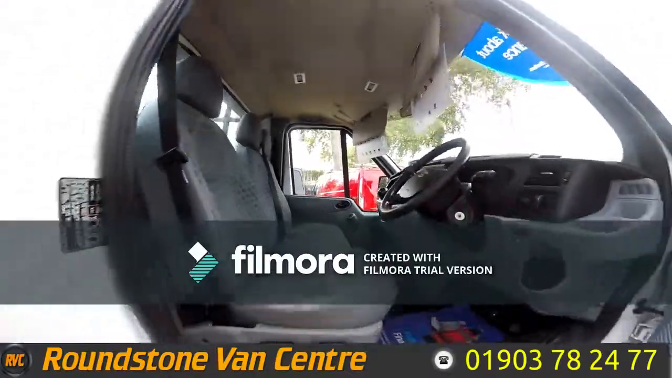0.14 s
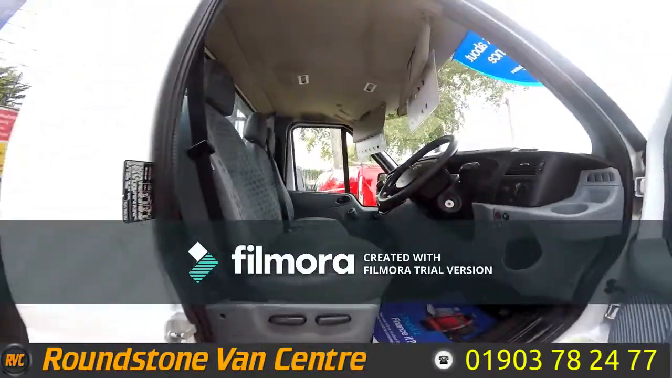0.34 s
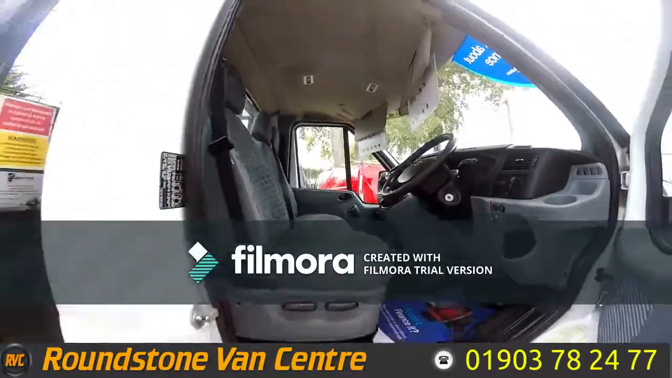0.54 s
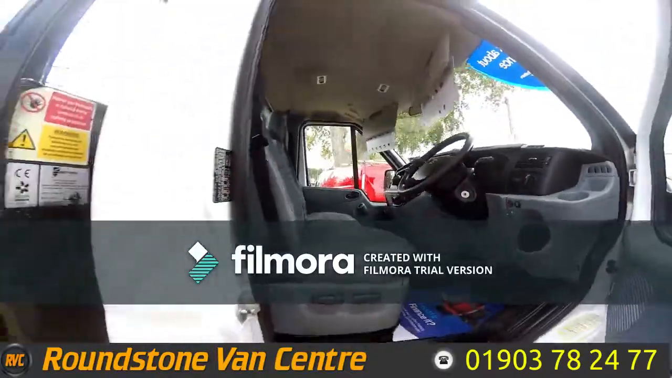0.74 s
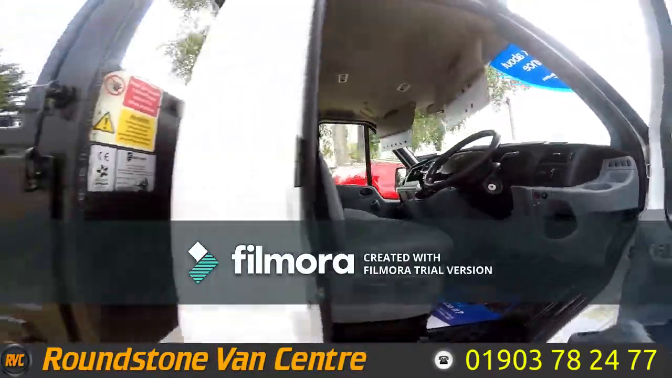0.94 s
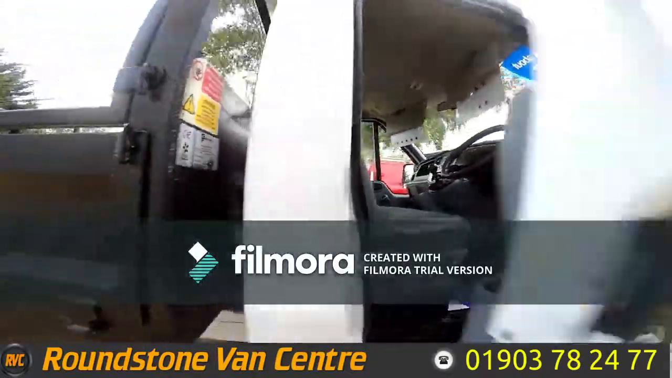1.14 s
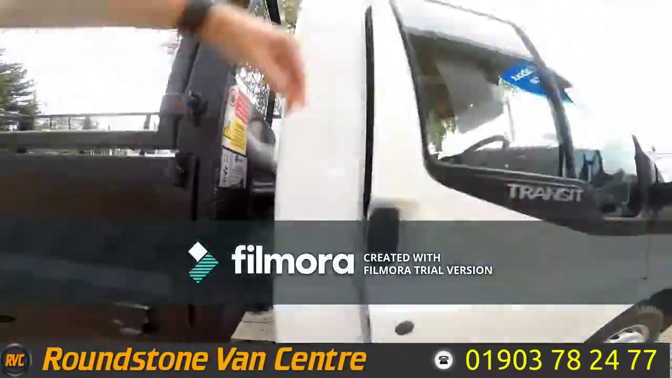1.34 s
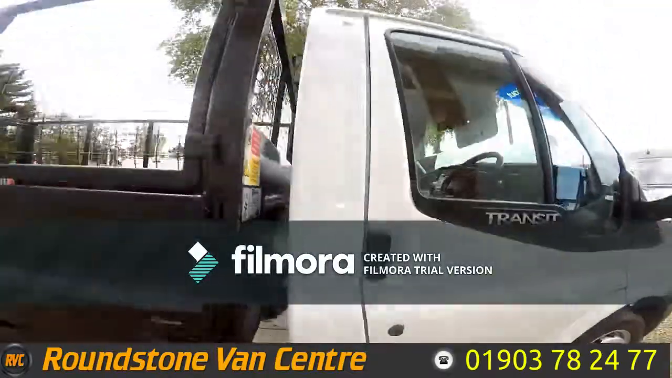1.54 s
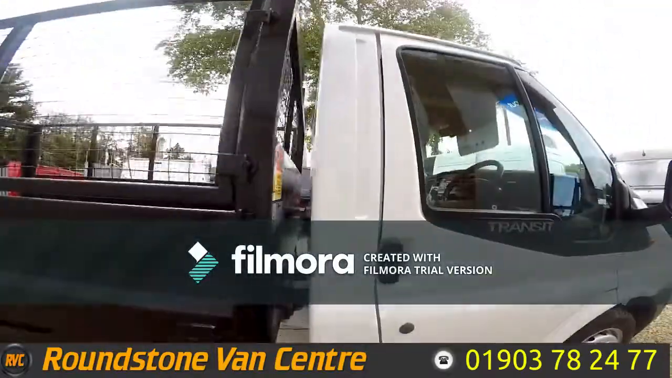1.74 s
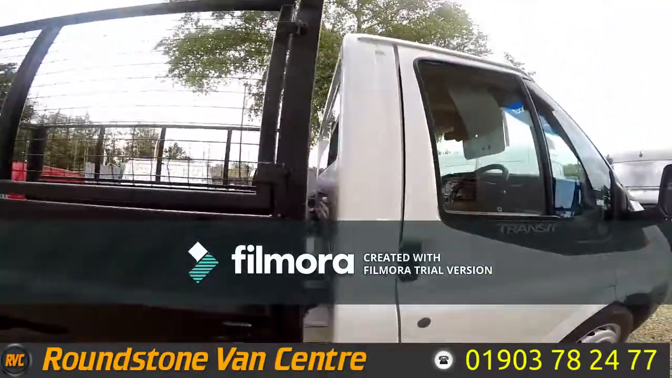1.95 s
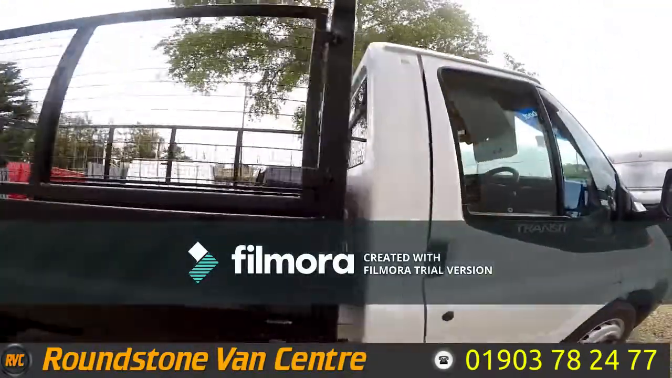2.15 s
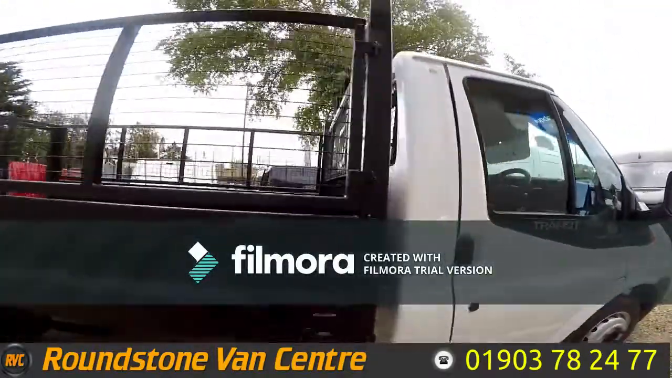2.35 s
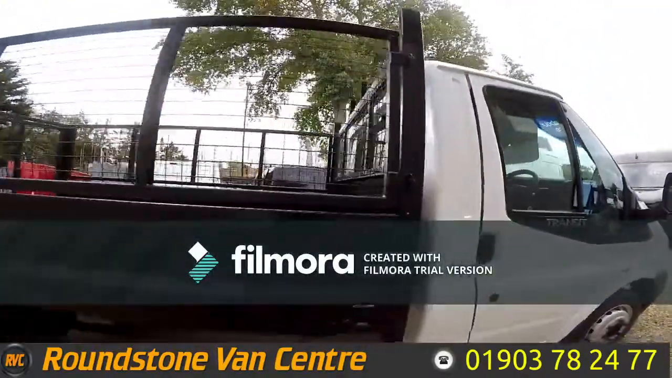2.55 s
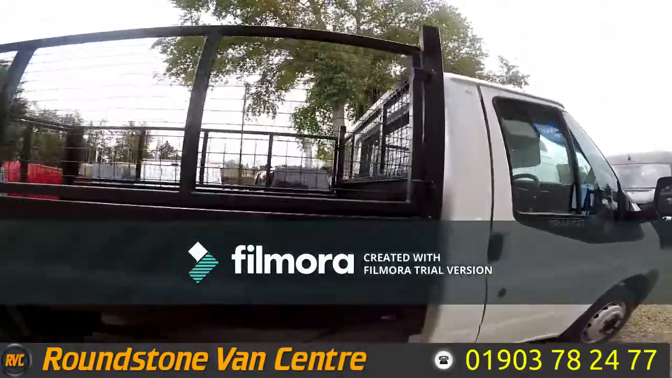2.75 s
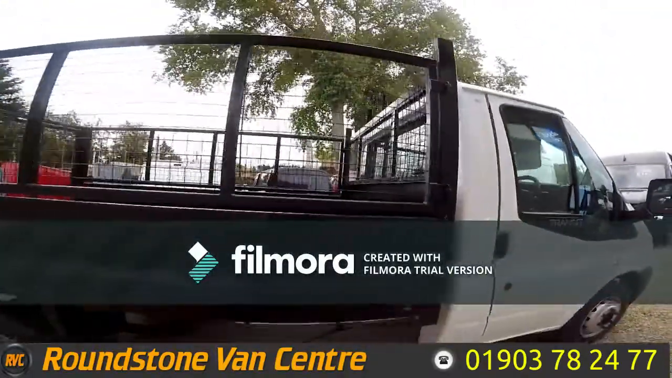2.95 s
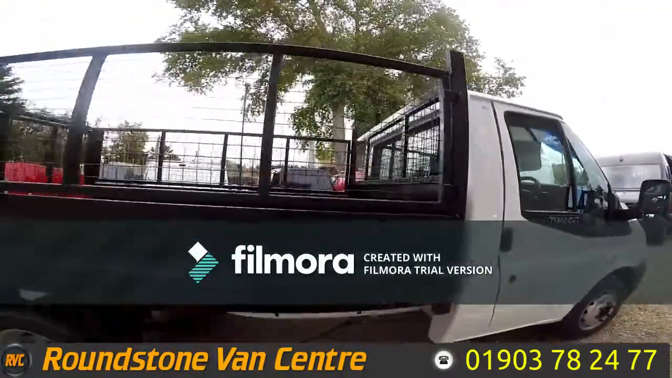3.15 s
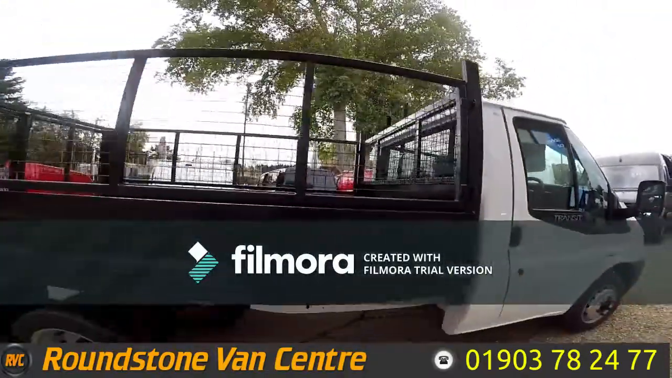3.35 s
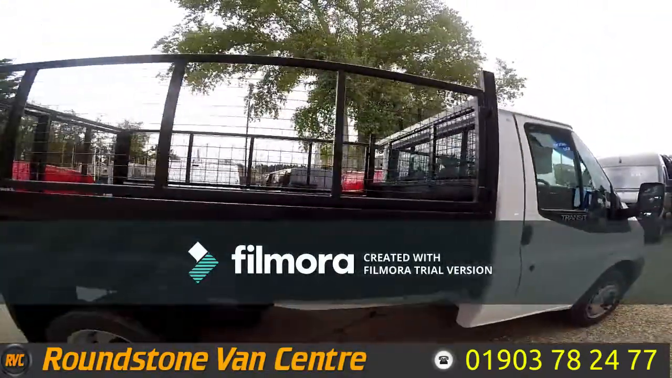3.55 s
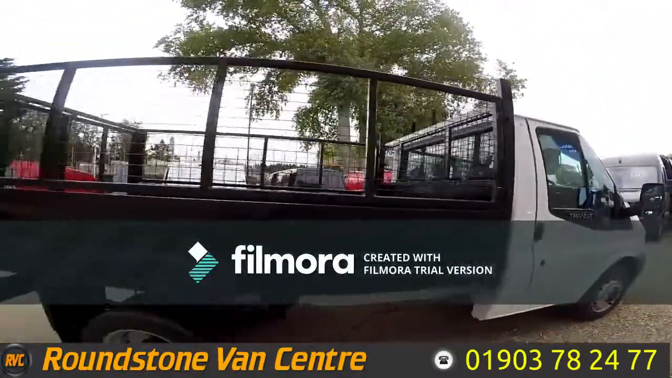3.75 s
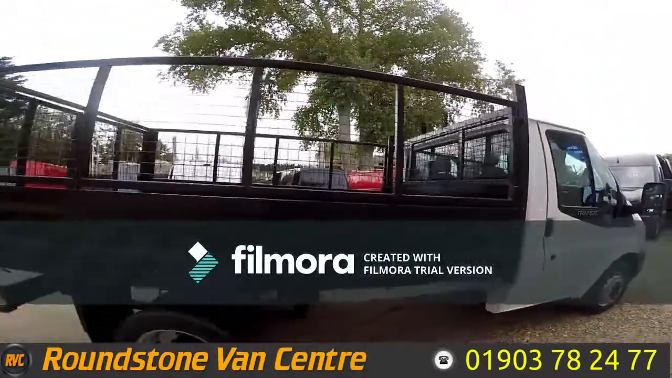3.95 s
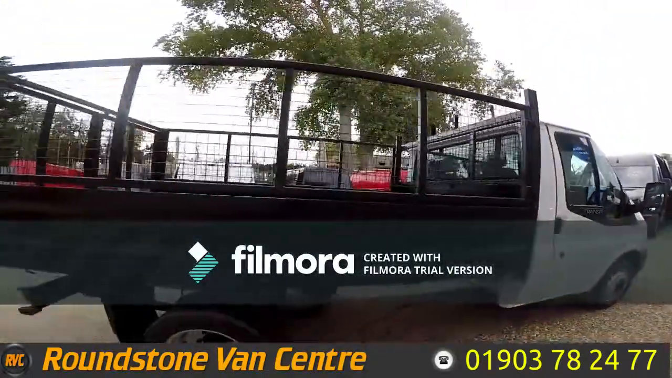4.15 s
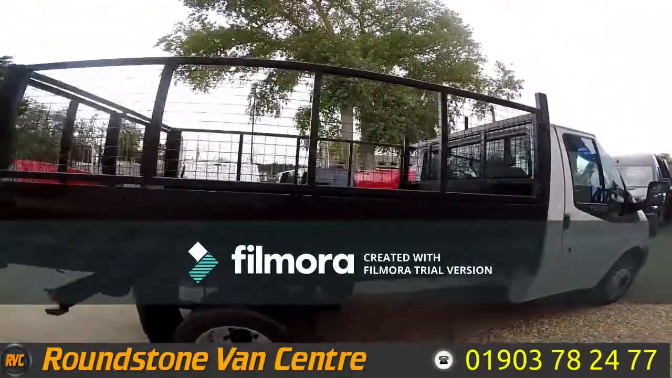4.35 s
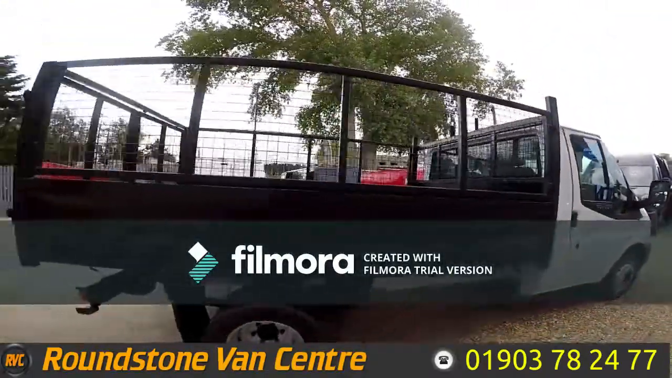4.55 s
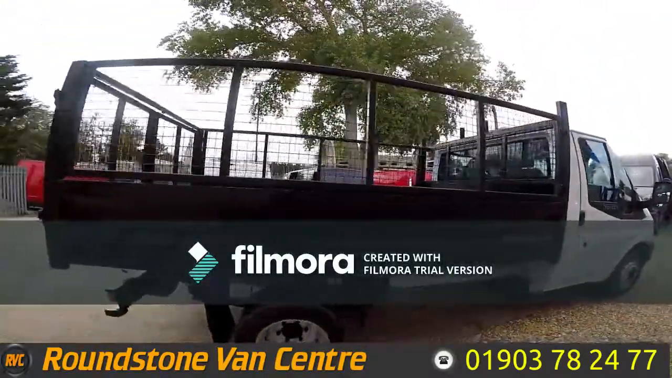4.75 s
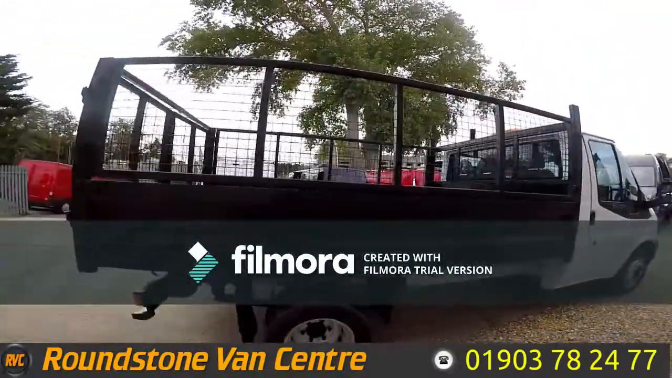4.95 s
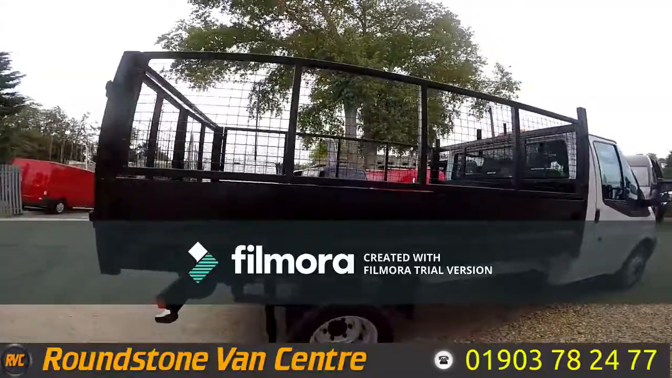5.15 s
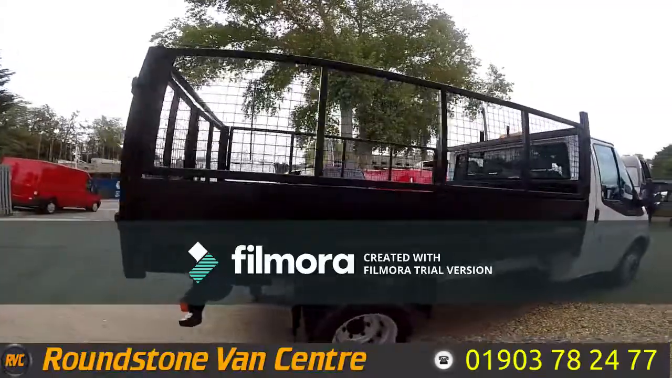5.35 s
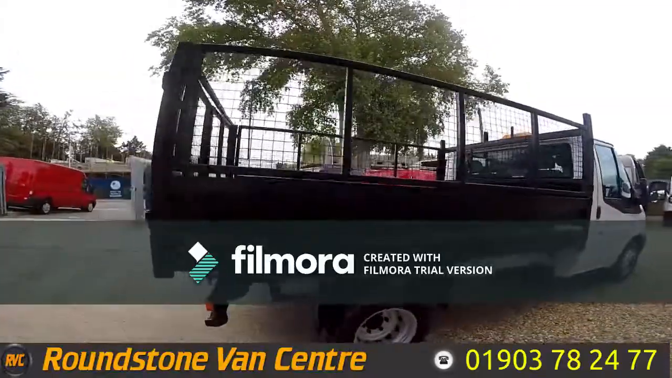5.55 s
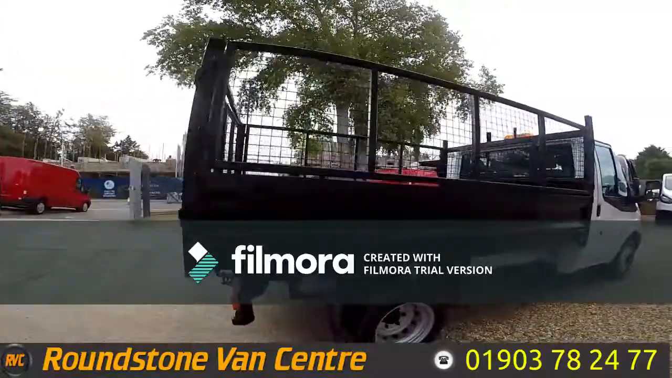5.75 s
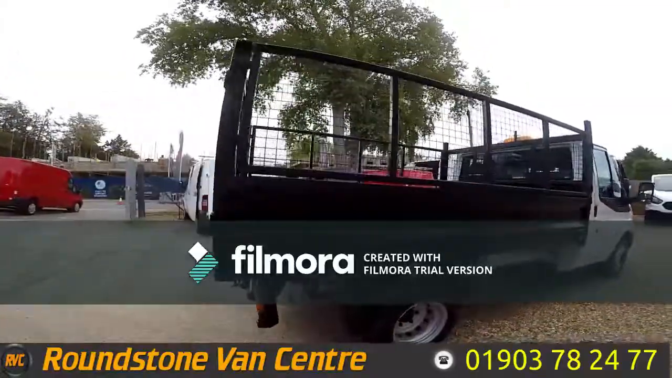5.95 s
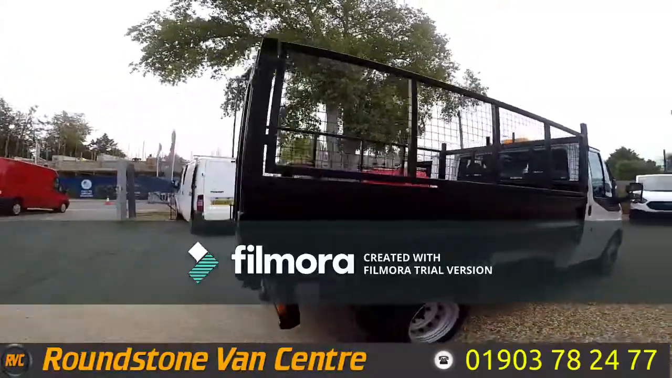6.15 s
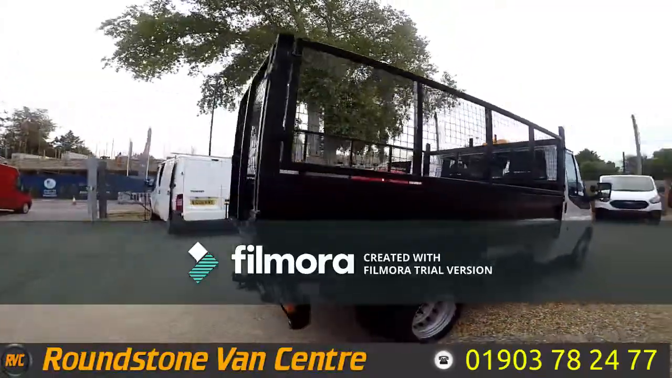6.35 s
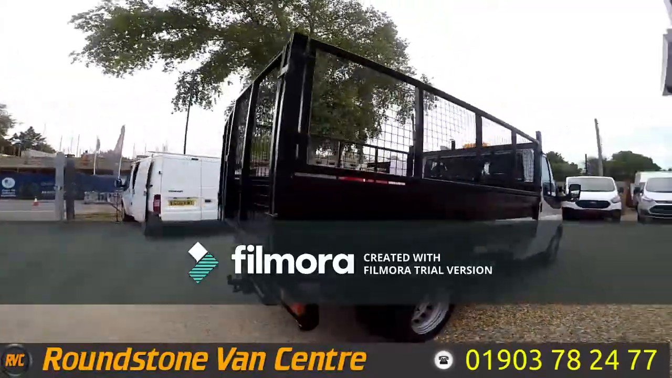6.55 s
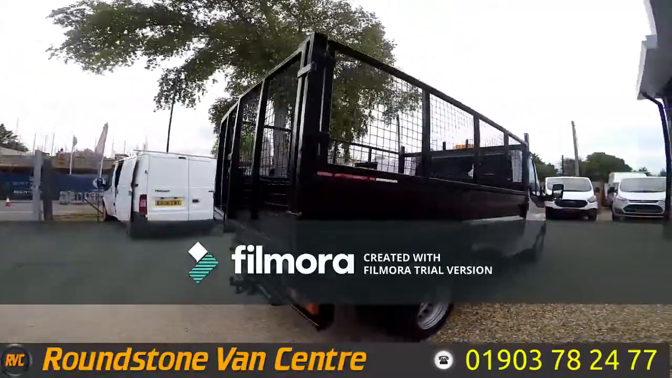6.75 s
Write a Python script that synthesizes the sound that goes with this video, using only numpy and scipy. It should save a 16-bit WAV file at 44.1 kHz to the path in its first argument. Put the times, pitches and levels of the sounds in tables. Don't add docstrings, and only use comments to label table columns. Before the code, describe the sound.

Outdoors in a gravel yard, close to a handheld microphone, feet crunch lightly and pebbles slip. A van door slams with a sharp metallic latch crack, deep thump and brief rattle. The background dips, then returns with gravel steps, mount ticks, wind lumps and distant traffic. A far engine climbs in pitch, then eases down.

```python
import sys
import numpy as np
from scipy import signal
from scipy.fft import rfft, irfft, next_fast_len
from scipy.io import wavfile
from scipy.ndimage import uniform_filter1d, map_coordinates

SR = 44100
rng = np.random.default_rng(int(sys.argv[2]) if len(sys.argv) > 2 else 0)


def inscribe(sig):
    pcm = np.round(np.clip(np.atleast_2d(sig).T, -1, 1) * 32767)
    wavfile.write(sys.argv[1], SR, pcm.astype(np.int16))


def decibels_to_gain(level_db):
    exponent = np.asarray(level_db, float) / 20
    return 10 ** exponent


N = 299880

# time in seconds, gust level in dB.
GUSTS = [(0, -28), (.78, -28.5), (.93, -23.5), (1.3, -24.5), (1.55, -13.5), (1.8, -17.5), (2.1, -22.5),
         (2.46, -28.5), (2.95, -28), (3.5, -27), (3.82, -25.5), (4.1, -33.5), (4.98, -32.5), (5.13, -23),
         (5.45, -24.5), (5.85, -19.5), (6.1, -24.5), (6.8, -22.5)]
# frequency in Hz, density in dB per Hz.
BUFFET_COLOUR = [(8.8, -59), (15, 3), (38, 2.5), (97, -4.5), (119, -11.5), (162, -11.5), (250, -18.5),
                 (320, -24.5), (550, -120)]
# frequency in Hz, density in dB per Hz.
ROAD_COLOUR = [(76, -16), (130, -1), (180, -10), (256, -13.5), (350, -15.5), (395, -9.5), (440, -14),
               (620, -19), (680, -22.5), (1200, -24), (1600, -41.5), (2600, -45.5), (3400, -89),
               (5700, -120)]
# frequency in Hz, level in dB.
WHINE_TONES = [(1000, -56), (2000, -68)]
# frequency in Hz, density in dB per Hz.
HISS_COLOUR = [(880, 7.5), (1500, 5.5), (2560, 0), (2980, 2), (4440, 0.5), (6910, 0.5), (7490, -6.5),
               (10300, -11.5), (13000, -23.5)]
# start in seconds, hold in seconds, crunch in dB, heel weight in dB.
FOOTSTEPS = [(.01, 0.015, -48.5, 10), (0.145, 0.23, -45.5, -13), (0.517, 0.055, -42, -16),
             (0.675, 0.036, -48.5, 10.5), (1.039, 0.18, -48.5, 8.5), (1.222, 0.023, -26.5, -11),
             (2.24, 0.077, -43.5, -4), (2.488, 0.049, -49, -5), (2.554, 0.076, -42.5, -11),
             (2.961, 0.19, -42, 4), (3.239, 0.3, -40, -4), (3.638, 0.15, -36, 1.5),
             (3.84, 0.14, -34.5, -11), (4.055, 0.0083, -32.5, -5), (4.201, 0.054, -41.5, -13),
             (4.337, 0.028, -45.5, 6), (4.431, 0.089, -48, 9.5), (4.929, 0.084, -39.5, 5),
             (5.036, 0.029, -40, 5.5), (5.141, .025, -41, -14), (5.26, 0.062, -52, -2),
             (5.35, 0.02, -50, -3), (5.521, 0.059, -34, 1), (5.606, 0.053, -50.5, 10.5),
             (6.073, 0.015, -42, 7), (6.155, 0.047, -41, 5), (6.236, 0.041, -54.5, 13),
             (6.418, .025, -49, 1), (6.474, 0.023, -53, 5), (6.7747, .05, -36.5, 5)]
# start in seconds, peak in dB.
PEBBLE_SLIPS = [(0.234, -22), (0.2634, -27), (0.2987, -26), (0.3323, -18.5), (0.3616, -20.5), (0.385, -24),
                (0.4823, -23), (0.55, -24), (1.3153, -26), (1.3468, -31), (1.719, -39), (1.997, -41),
                (2.6018, -22), (3.0195, -28), (3.0724, -24), (3.1193, -28), (3.3608, -18.5), (3.4131, -24),
                (3.44, -23.5), (3.745, -22.5), (3.93, -49), (4.1315, -27), (4.1607, -21.5), (4.2463, -22),
                (5.1561, -18.5), (5.255, -23), (5.2736, -21), (5.3004, -22.5), (6.1669, -22), (6.491, -21)]
# frequency in Hz, density in dB per Hz.
GRIT_COLOUR = [(880, -20), (1500, -5.5), (1780, -21), (1910, -12), (2060, -7), (2860, -6.5), (4370, -0.5),
               (5570, -0.5), (6880, 3), (8930, -5), (10800, -17), (12500, -20.5), (15000, -27)]
# frequency in Hz, density in dB per Hz.
SAND_COLOUR = [(9500, -28), (11500, -5), (12800, 3), (14500, -11), (15500, -18)]
# frequency in Hz, density in dB per Hz.
HEEL_COLOUR = [(150, -40), (250, 11), (500, 6), (1100, -0.5), (1800, -4.5), (3000, -66)]
# start in seconds, peak in dB, pitch in Hz, brightness in dB.
KNOCKS = [(.784, -25.5, 1130, -13), (0.966, -20.5, 1780, -8), (1.025, -21, 1510, -9),
          (1.036, -24, 1940, -14), (1.173, -27, 1310, -4), (1.214, -25.5, 1250, -9),
          (2.489, -22.5, 1100, -10), (2.854, -15.5, 1050, -20.5), (2.950, -19.5, 1040, -25),
          (3.166, -29, 1030, -6), (3.37, -31, 980, -2.5), (3.703, -19.5, 1020, -9), (3.742, -28, 1400, -2),
          (3.843, -22, 2518, -12), (3.994, -29, 1160, -18), (5.434, -18.5, 1260, -23),
          (5.620, -23.5, 1300, -9), (6.755, -23.5, 1219, -12)]
# frequency in Hz, density in dB per Hz.
KNOCK_COLOUR = [(300, 0), (700, -0.5), (1200, 2), (2200, -10), (4500, -14), (8000, -58), (10000, -51)]
# start in seconds, peak in dB, pitch in Hz, T60 in seconds.
DULL_THUDS = [(.972, -21.5, 242.7, 0.18), (.980, -18.5, 155.4, 0.41), (1.024, -18, 244, 0.22),
              (1.037, -10.5, 159, 0.13), (1.175, -21.5, 252, 0.15), (3.704, -22, 271, 0.15),
              (3.715, -16.5, 364, 0.071), (3.744, -16.5, 275, 0.051)]
# start in seconds, peak in dB, body in dB.
DOOR_BLOWS = [(1.366, -37, 2), (1.374, -30, 4), (1.3842, -9, -2), (1.3924, -13, -2), (1.3984, -14, -4),
              (1.4124, -15, -6), (1.4346, -15, -6), (1.4524, -28, 3), (1.4754, -29, 8), (1.509, -13, -3),
              (1.5344, -26, 3), (1.5723, -21, -1)]
# pitch in Hz, level in dB, T60 in seconds.
LATCH_MODES = [(484, -4, .12), (800, -10, .1), (1050, -4, .08), (1220, -3, .08), (1370, -6, .08),
               (1530, -6, .08), (1700, -8, .06), (2045, -6, .07), (2375, -13, .07), (3250, -15, .08),
               (3565, -11, .05), (3787, -6, .05), (5706, -13, .045), (6250, -15, .04), (8974, -14, .1)]
# start in seconds, peak in dB, pitch in Hz, T60 in seconds.
DOOR_HEAVES = [(1.377, -11, 48.2, 0.44), (1.388, -16, 50, 0.13), (1.398, -2, 36.3, 0.23),
               (1.394, -6.5, 259, 0.1), (1.406, -3, 167, 0.062), (1.443, -6.5, 37.7, 0.42),
               (1.444, -12, 193, 0.14), (1.509, -5, 169, 0.093), (1.513, -0.5, 29.5, 0.14),
               (1.580, -7, 35.5, .25), (1.642, -9, 36, 0.14), (1.693, -14.5, 33.7, 0.27),
               (1.754, -10, 59.4, 0.15)]
# pitch in Hz, level in dB, T60 in seconds.
CAB_MODES = [(105.3, -20.5, 1), (149.6, -15, 0.32), (187, -20.5, 1), (227, -16.5, 0.79)]
# time in seconds, shaking in dB.
SHAKING = [(1.374, -32), (1.388, -10.5), (1.406, -14.5), (1.5, -21.5), (1.51, -15.5), (1.59, -26.5),
           (1.65, -36.5), (1.72, -44), (1.8, -52)]
# frequency in Hz, density in dB per Hz.
RATTLE_COLOUR = [(1180, -6), (2000, -4), (2410, -28), (3000, -8), (3260, -11.5), (6520, -9), (8680, -14),
                 (10200, -33), (15000, -39)]
# frequency in Hz, density in dB per Hz.
PANEL_COLOUR = [(120, -32), (200, -3), (300, 1), (400, -6), (485, -1), (640, -9), (800, -13.5), (1200, -32),
                (1600, -22), (2050, -33), (2800, -36), (4500, -49)]
# time in seconds, firing rate in Hz, loudness in dB.
ENGINE_RUN = [(2.9, 78.4, -34.5), (3.3, 82.3, -29.5), (3.55, 83.55, -29), (4.06, 90.4, -19),
              (4.24, 91.3, -25.5), (4.57, 103.8, -24), (4.72, 105.4, -23), (4.9, 108.2, -27),
              (5.15, 116.1, -35), (5.42, 128.6, -26), (5.75, 135.1, -31.5), (5.94, 144.3, -29.5),
              (6.04, 144.5, -13.5), (6.17, 142.6, -27.5), (6.29, 138.2, -27.5), (6.6, 123.5, -24),
              (6.76, 120.7, -14.5), (6.8, 119.7, -11)]
# order rate in Hz, level in dB.
EXHAUST = [(40, -31.5), (45, -25), (52, -28.5), (62, -24), (69, -29), (130, -38.5), (178, -32), (200, -42)]

DUCK_S, DUCK_DB, DUCK_FALL_S, DUCK_HOLD_S, DUCK_BACK_S = 1.31, -8, 0.44, 0.36, 0.43
ROAD_DB, ROAD_DB_PER_S, ROAD_GUST = -34.5, 0.6169, 0.17
HISS_DB, HISS_DB_PER_S, HISS_GUST = -49, 0.6637, 0.05
STEP_RISE_S, SETTLE_S, SHUFFLE_DB = 0.019, 0.11, -60.5
SAG_DB_PER_S = 11.5
SAND_DB, SAND_LIGHTNESS = -25, 0.4
CRACKLE = 0.5
SLIP_DB = 12
STONE_HZ, STONE_SPREAD, SLIP_T60_S = 6790, 0.051, 0.058
RATTLE_DB, RATTLE_GROWS, PANEL_DB, ECHO_DB = -14, 1.17, -3, -8
OVERRUN_DB, FOURTH_DB, FLUTTER_DB = -8, -22.5, 2.4


def unit(x):
    return x / np.sqrt(np.mean(x ** 2) + 1e-20)


def clock(seconds=N / SR):
    return np.arange(int(round(seconds * SR))) / SR


def curves(rows):
    s, *columns = np.transpose(rows)
    return [np.interp(clock(), s, column) for column in columns]


def inside(rows):
    t = clock()
    return np.clip(np.minimum(t - rows[0][0], rows[-1][0] - t) * 100 + 1, 0, 1)


def wobble(rate):
    knots = rng.standard_normal(int(N * rate / SR) + 4)
    return map_coordinates(knots, [np.arange(N) * rate / SR])


def coloured(x, spectrum):
    size = next_fast_len(len(x) + 8192)
    hz, db = np.transpose(spectrum)
    bins = np.fft.rfftfreq(size, 1 / SR)
    gain = decibels_to_gain(np.interp(np.log(bins + 1), np.log(hz + 1), db, -120, -120))
    return unit(irfft(rfft(x, size) * gain, size)[:len(x)])


def rush(spectrum, patchy_db):
    z = signal.stft(rng.standard_normal(N + 512), nperseg=512)[2]
    patches = uniform_filter1d(rng.standard_normal(z.shape), 6, 0)
    patches = uniform_filter1d(patches, 12, 1)
    noise = signal.istft(z * decibels_to_gain(patchy_db * unit(patches)), nperseg=512)[1]
    return coloured(noise[:N], spectrum)


def grains(share, spread_db):
    size = decibels_to_gain(spread_db * rng.exponential(size=N))
    return (rng.random(N) < share) * rng.standard_normal(N) * size


def ring(hz, t60, t):
    return decibels_to_gain(-60 * t / t60) * np.sin(2 * np.pi * hz * t)


def burst(spectrum, t60, t):
    return decibels_to_gain(-60 * t / t60) * coloured(rng.standard_normal(len(t)), spectrum)


def attack(rise_s, t):
    return 1 - np.exp(-t / rise_s)


def add(track, s, sound):
    part = track[round(s * SR):][:len(sound)]
    part += sound[:len(part)]


def thuds(rows):
    out, t = np.zeros(N), clock(1 / 3)
    for s, db, hz, t60 in rows:
        add(out, s, decibels_to_gain(db) * ring(hz, t60, t) * attack(0.00045, t))
    return out


def gain_control():
    corners = DUCK_S + np.cumsum([0, DUCK_FALL_S, DUCK_HOLD_S, DUCK_BACK_S])
    return DUCK_DB * np.interp(clock(), corners, [0, 1, 1, 0])


def gust_swing():
    gust_db, = curves(GUSTS)
    return gust_db - gust_db.mean()


def wind():
    gust_db, = curves(GUSTS)
    buffet = unit(decibels_to_gain(0.54 * wobble(9)) * rush(BUFFET_COLOUR, patchy_db=0.65))
    return decibels_to_gain(gust_db + 2.5) * buffet


def traffic():
    t = clock()
    tyres = decibels_to_gain(0.75 * wobble(6.5)) * rush(ROAD_COLOUR, patchy_db=2.5)
    whine = sum(decibels_to_gain(db) * np.sin(2 * np.pi * hz * t) for hz, db in WHINE_TONES)
    level_db = ROAD_DB + ROAD_DB_PER_S * t + ROAD_GUST * gust_swing()
    return decibels_to_gain(level_db) * (tyres + decibels_to_gain(34) * whine)


def leaves_and_preamp():
    level_db = HISS_DB + HISS_DB_PER_S * clock() + HISS_GUST * gust_swing()
    return decibels_to_gain(level_db) * rush(HISS_COLOUR, patchy_db=1.7)


def gravel():
    stones = grains(0.25, spread_db=1.5) + 0.36 * rng.standard_normal(N)
    stones += CRACKLE * unit(grains(0.012, spread_db=1.2))
    grit = coloured(decibels_to_gain(2.05 * wobble(140)) * stones, GRIT_COLOUR)
    sand = coloured(decibels_to_gain(3.7 * wobble(60)) * grains(0.1, spread_db=-1), SAND_COLOUR)
    heel = coloured(decibels_to_gain(0.52 * wobble(40)) * grains(0.069, spread_db=2.5), HEEL_COLOUR)
    roll_db = 1.9 * np.pad(wobble(22), (0, SR))
    out, t = decibels_to_gain(SHUFFLE_DB + gain_control()) * grit, clock(0.5)
    for s, hold, db, weight_db in FOOTSTEPS:
        start = round(s * SR)
        settle_db = (SHUFFLE_DB - db) * np.maximum(t - hold, 0) / SETTLE_S
        load_db = db + settle_db - SAG_DB_PER_S * t + roll_db[start:][:len(t)]
        load = decibels_to_gain(load_db) * np.minimum(t / STEP_RISE_S, 1)
        crunch = grit + decibels_to_gain(weight_db) * heel + decibels_to_gain(SAND_DB - SAND_LIGHTNESS * weight_db) * sand
        crunch = crunch[start:][:len(t)]
        add(out, s, load[:len(crunch)] * crunch)
    return out


def pebbles():
    out, t = np.zeros(N), clock(SR // 8 / SR)
    landings = [(s, db + SLIP_DB) for s, _, db, _ in FOOTSTEPS]
    for s, db in landings + list(PEBBLE_SLIPS):
        hz = STONE_HZ * np.exp(STONE_SPREAD * rng.standard_normal())
        slip = burst(GRIT_COLOUR, SLIP_T60_S, t) + 1.9 * ring(hz, 0.01, t)
        add(out, s, decibels_to_gain(db - 10) * slip * attack(0.00048, t))
    return out


def ticks():
    out, t = thuds(DULL_THUDS), clock(SR // 8 / SR)
    for s, db, hz, bright_db in KNOCKS:
        knock = ring(hz, 0.018, t) + 0.4 * burst(KNOCK_COLOUR, 0.012, t)
        knock += decibels_to_gain(bright_db + 1.5) * burst(KNOCK_COLOUR, 0.097, t)
        add(out, s, decibels_to_gain(db) * knock * attack(0.0011, t))
    return out


def door():
    out, t = thuds(DOOR_HEAVES), clock(0.25)
    for s, db, body_db in DOOR_BLOWS:
        steel = sum(decibels_to_gain(level) * rng.uniform(0.57, 1) * ring(hz, t60, t) for hz, level, t60 in LATCH_MODES)
        steel *= decibels_to_gain(-160 * max(s - 1.4, 0))
        blow = 1.15 * steel + 0.45 * burst(RATTLE_COLOUR, 0.035, t)
        blow += decibels_to_gain(body_db) * burst(PANEL_COLOUR, 0.08, t)
        add(out, s, decibels_to_gain(db - 4) * blow * attack(0.0005, t))
    return out


def shudder():
    shake_db, = curves(SHAKING)
    below_peak_db = shake_db - shake_db.max()
    rattle = coloured(decibels_to_gain(3.6 * wobble(65.75)) * grains(0.49, spread_db=3.5), RATTLE_COLOUR)
    panel = unit(decibels_to_gain(3.5 * wobble(45)) * rush(PANEL_COLOUR, patchy_db=3))
    echo = rush(KNOCK_COLOUR, patchy_db=3)
    mix = decibels_to_gain(RATTLE_DB + (RATTLE_GROWS - 1) * below_peak_db) * rattle
    mix += decibels_to_gain(PANEL_DB) * panel
    mix += decibels_to_gain(ECHO_DB + 0.27 * below_peak_db) * echo
    return inside(SHAKING) * decibels_to_gain(shake_db) * mix


def cab():
    out, t = np.zeros(N), clock(1)
    hum = sum(decibels_to_gain(db) * ring(hz, t60, t) for hz, db, t60 in CAB_MODES)
    add(out, 1.385, hum * attack(0.011, t))
    return out


def exhaust_level(order_hz):
    return np.interp(order_hz, *np.transpose(EXHAUST)) + FLUTTER_DB * wobble(9)


def engine():
    hz, firing_db = curves(ENGINE_RUN)
    turn = 2 * np.pi * np.cumsum(hz) / SR
    off_throttle = uniform_filter1d(1.0 * (np.gradient(hz) < 0), size=SR // 8)
    firing = np.sin(turn + 0.29 * wobble(16))
    firing += decibels_to_gain(FOURTH_DB) * np.sin(2 * turn + 1.4 * wobble(16))
    firing *= decibels_to_gain(firing_db + 2.5 + 0.76 * wobble(12))
    shaft_db = exhaust_level(hz / 2) + 5 + OVERRUN_DB * off_throttle
    shaft = decibels_to_gain(shaft_db) * np.sin(turn / 2 + 0.83 * wobble(12))
    third = decibels_to_gain(exhaust_level(hz * 3 / 2)) * np.sin(turn * 3 / 2 + 0.5 * wobble(10))
    return inside(ENGINE_RUN) * (firing + shaft + third)


def scene():
    background = decibels_to_gain(gain_control()) * (wind() + traffic() + leaves_and_preamp())
    feet = gravel() + pebbles()
    slam = door() + shudder() + cab()
    return (background + feet + ticks() + slam + engine())[None]


def top_cut(x):
    return signal.sosfilt(signal.butter(12, 15180, fs=SR, output="sos"), x)


def record(dry):
    rounded = dry / (1 + np.abs(dry / 0.95) ** 6) ** (1 / 6)
    return top_cut(rounded)


dry = scene()
out = record(dry)
inscribe(out)
```